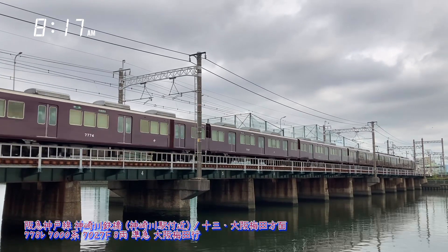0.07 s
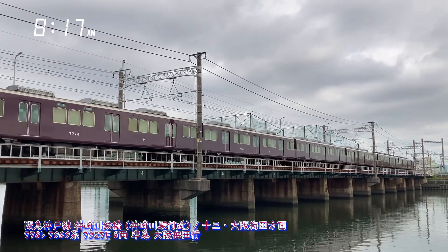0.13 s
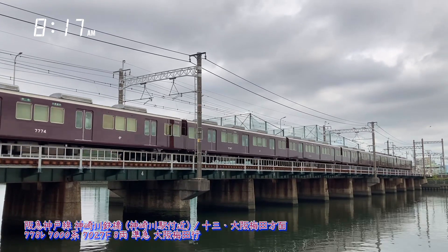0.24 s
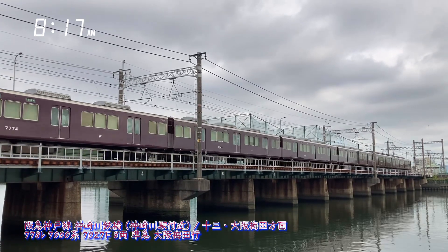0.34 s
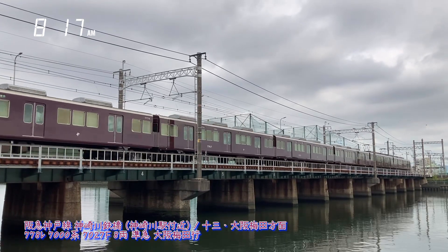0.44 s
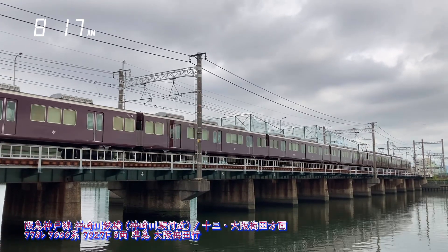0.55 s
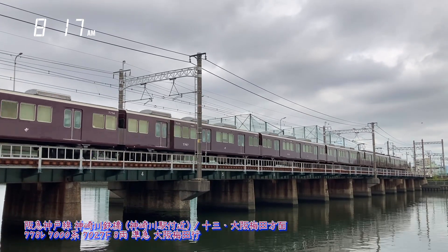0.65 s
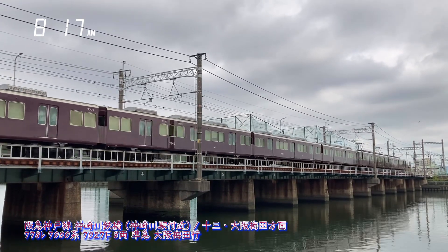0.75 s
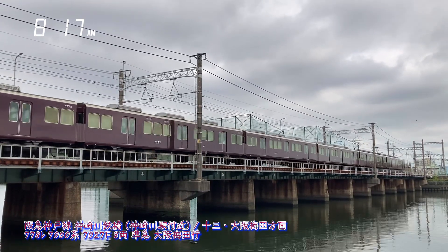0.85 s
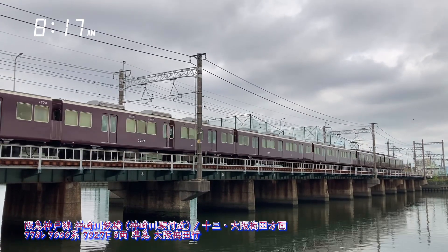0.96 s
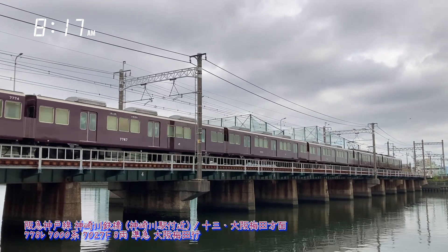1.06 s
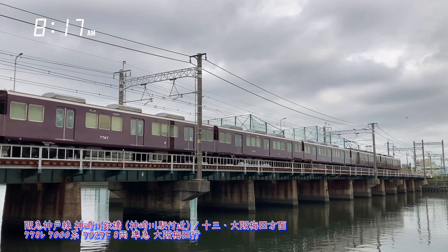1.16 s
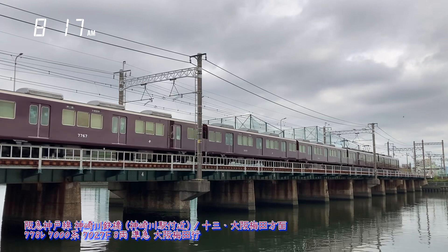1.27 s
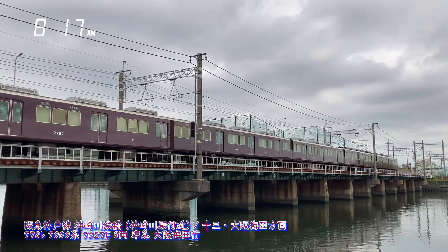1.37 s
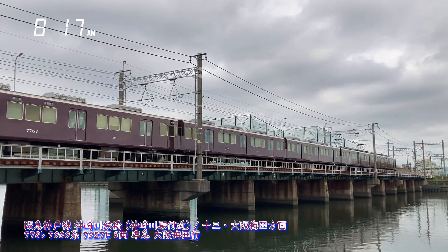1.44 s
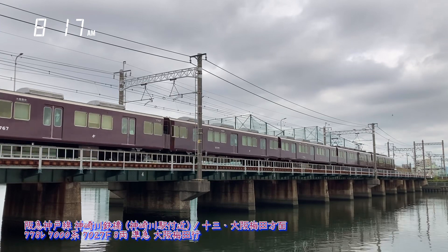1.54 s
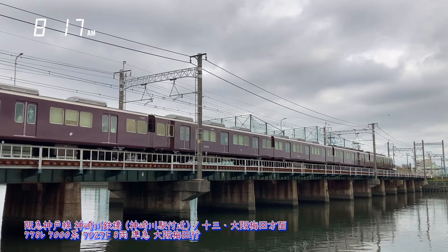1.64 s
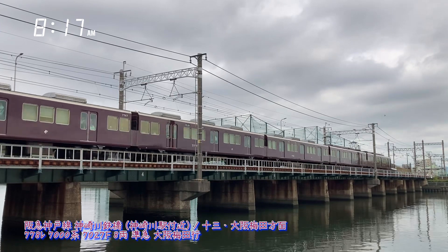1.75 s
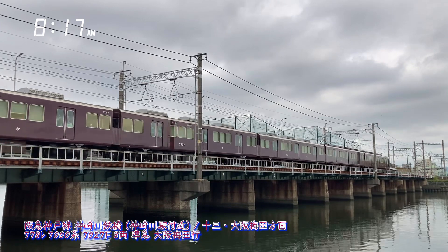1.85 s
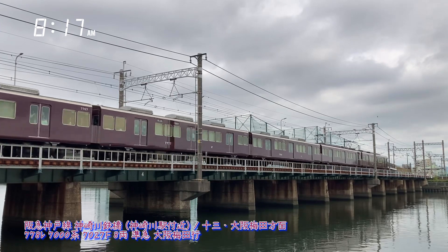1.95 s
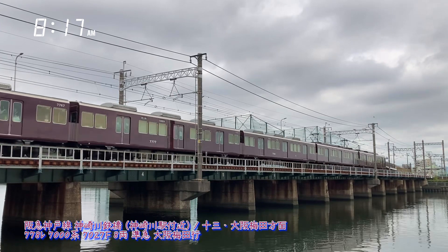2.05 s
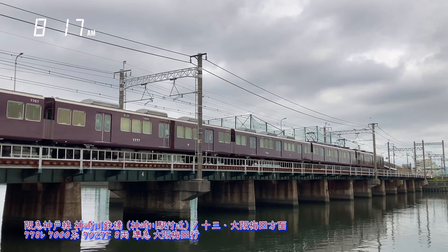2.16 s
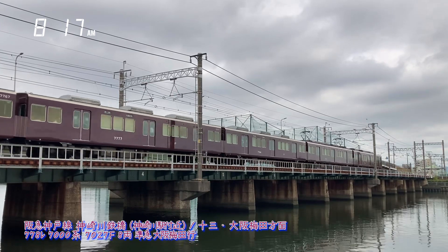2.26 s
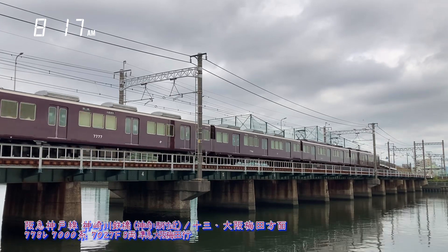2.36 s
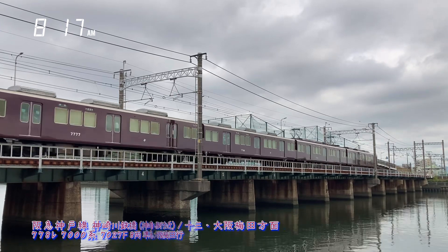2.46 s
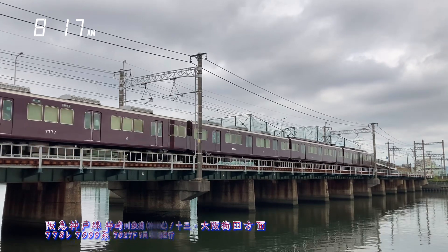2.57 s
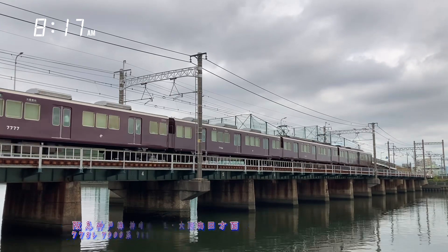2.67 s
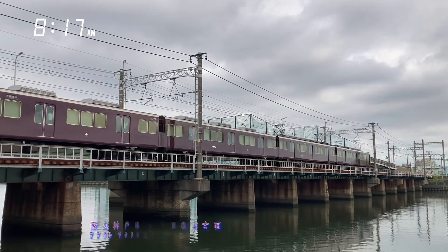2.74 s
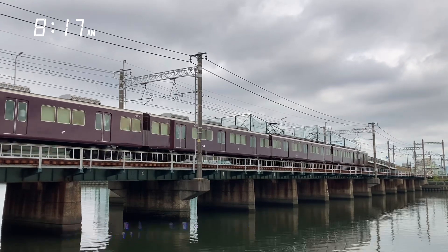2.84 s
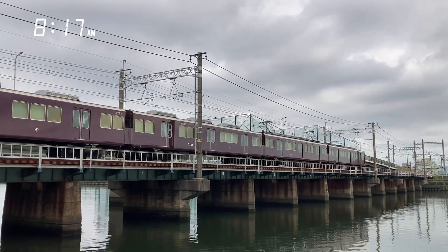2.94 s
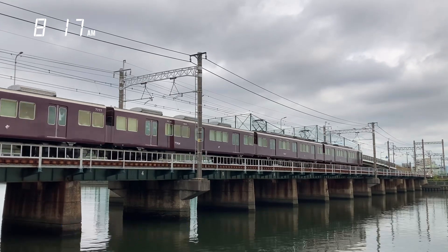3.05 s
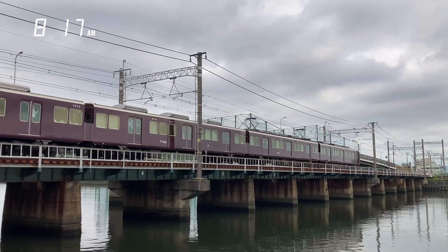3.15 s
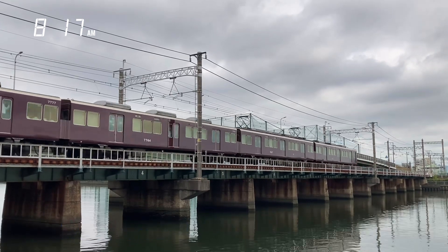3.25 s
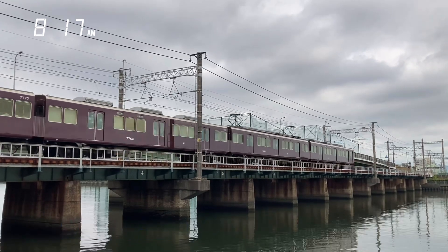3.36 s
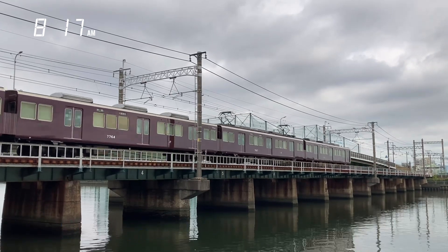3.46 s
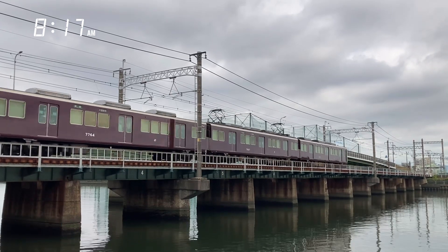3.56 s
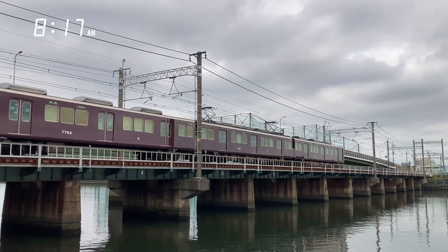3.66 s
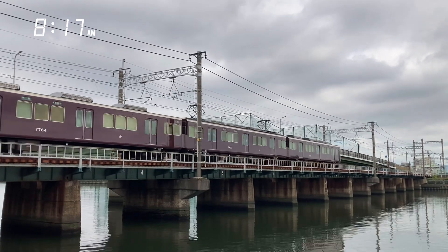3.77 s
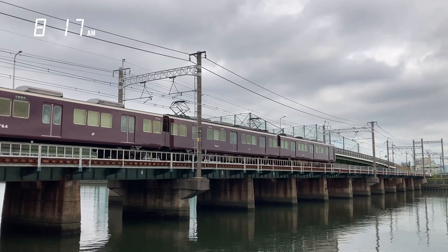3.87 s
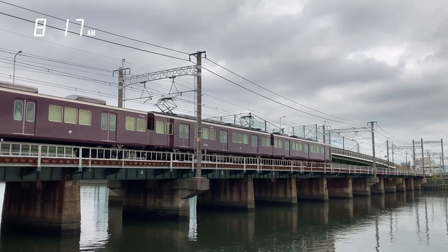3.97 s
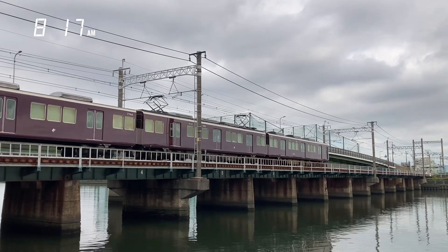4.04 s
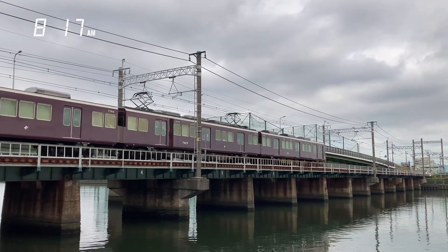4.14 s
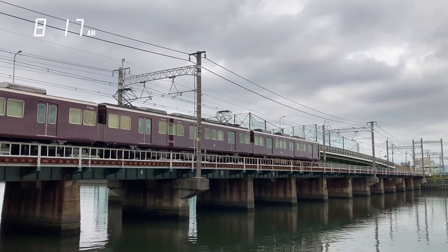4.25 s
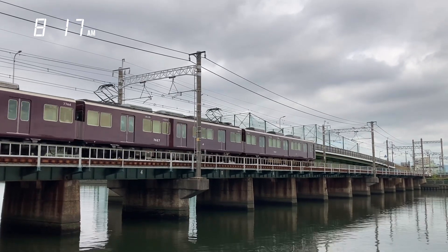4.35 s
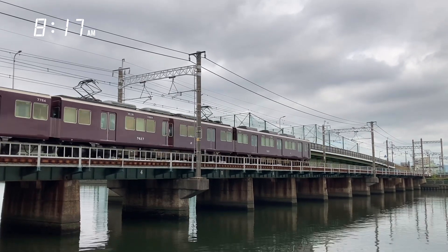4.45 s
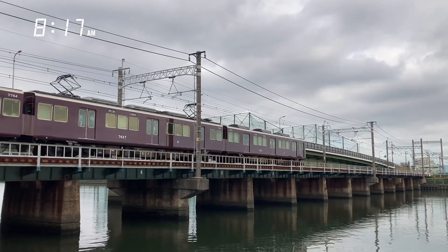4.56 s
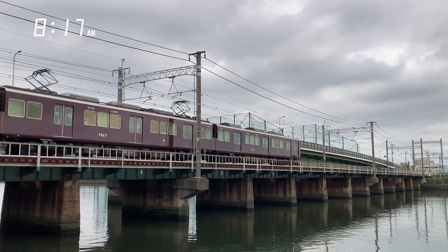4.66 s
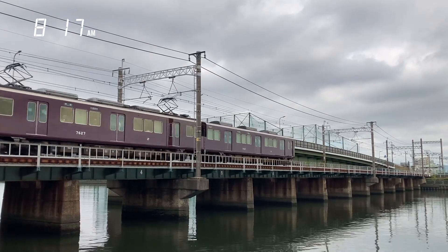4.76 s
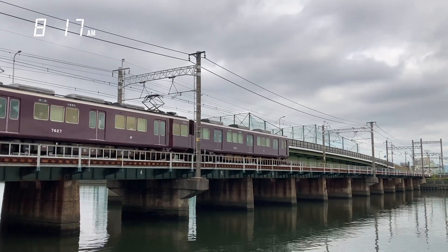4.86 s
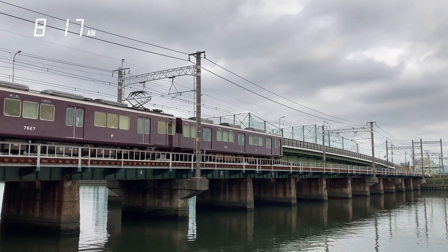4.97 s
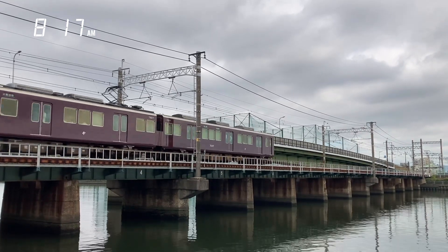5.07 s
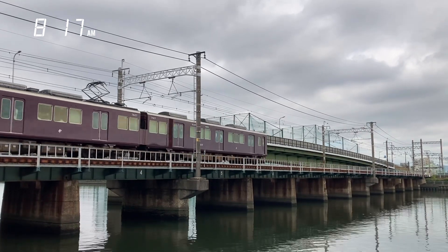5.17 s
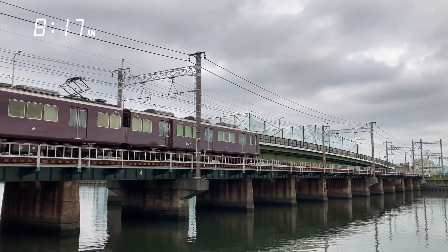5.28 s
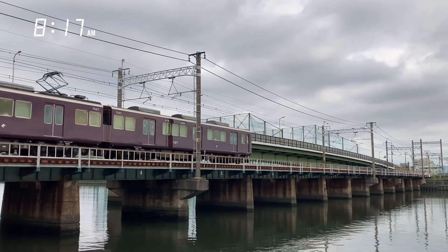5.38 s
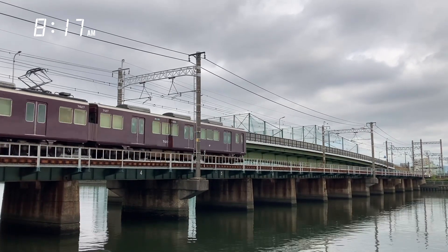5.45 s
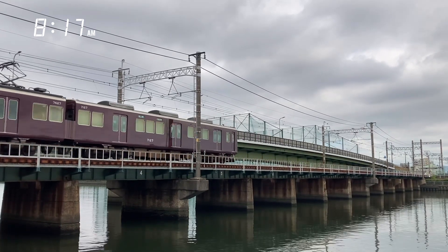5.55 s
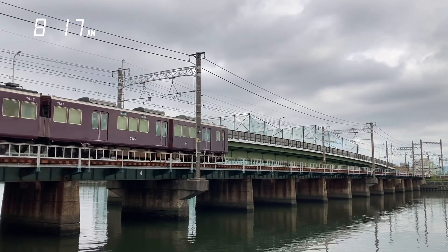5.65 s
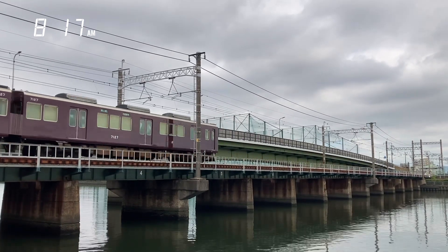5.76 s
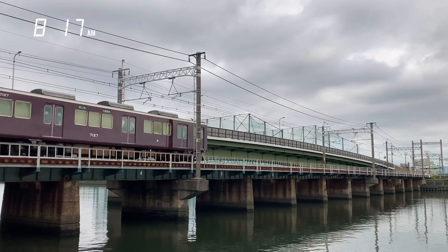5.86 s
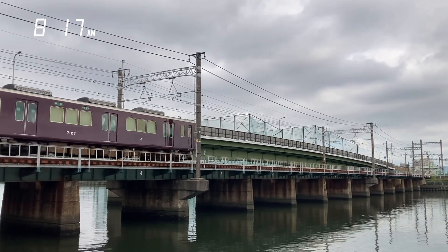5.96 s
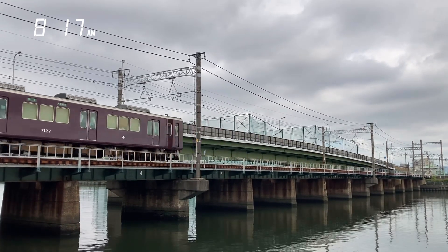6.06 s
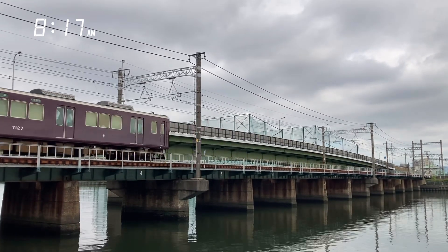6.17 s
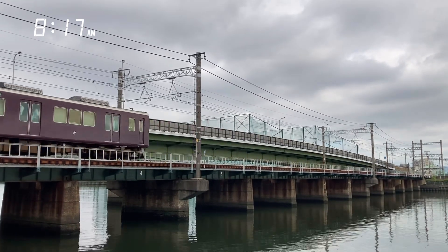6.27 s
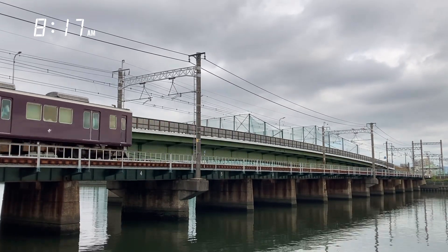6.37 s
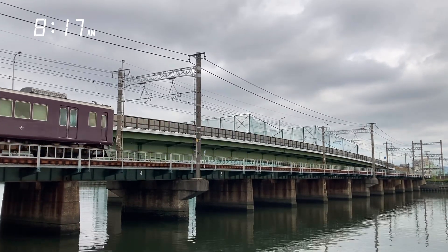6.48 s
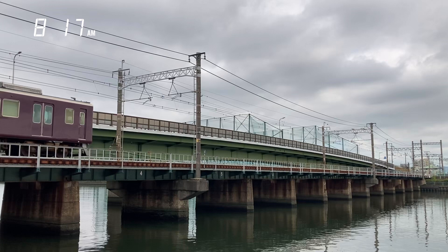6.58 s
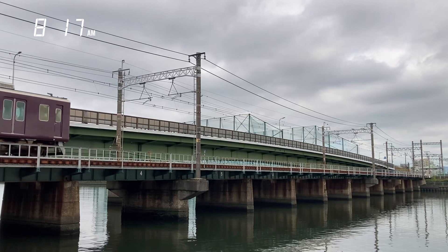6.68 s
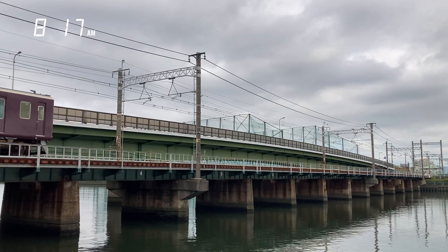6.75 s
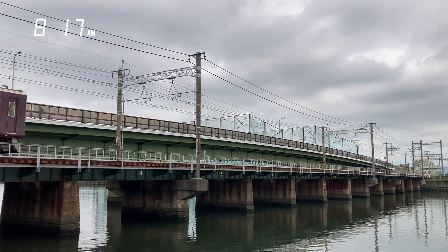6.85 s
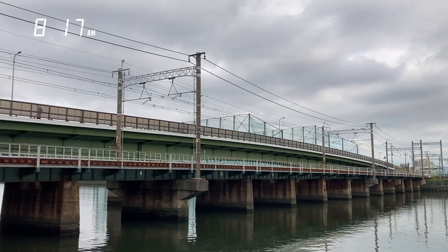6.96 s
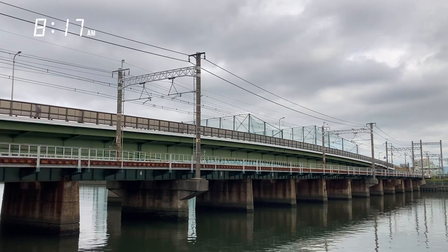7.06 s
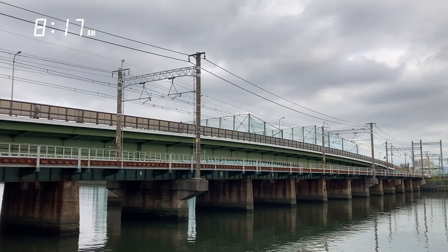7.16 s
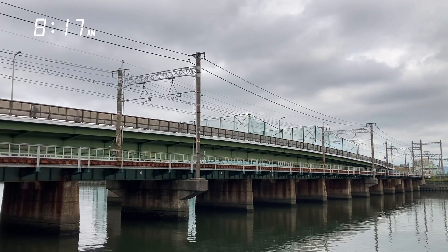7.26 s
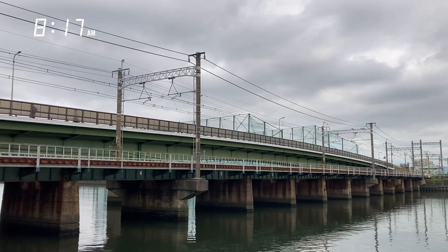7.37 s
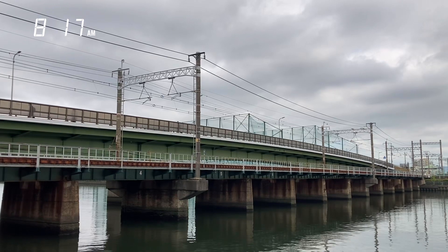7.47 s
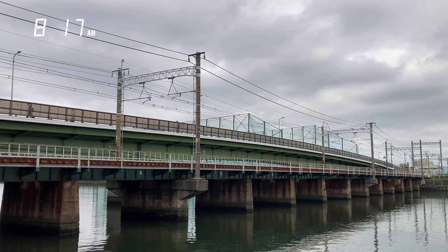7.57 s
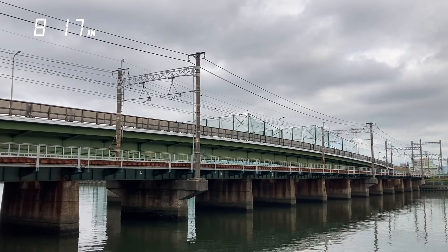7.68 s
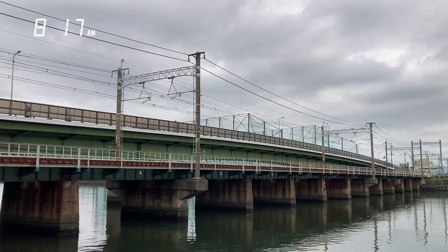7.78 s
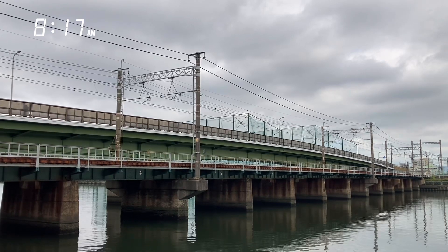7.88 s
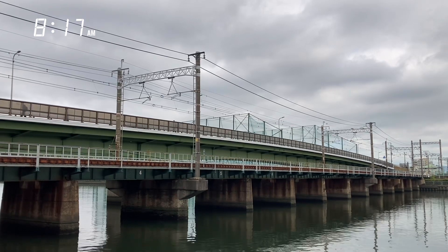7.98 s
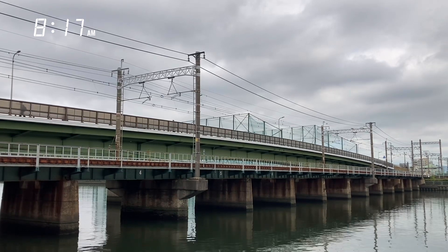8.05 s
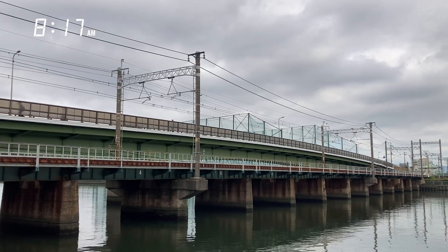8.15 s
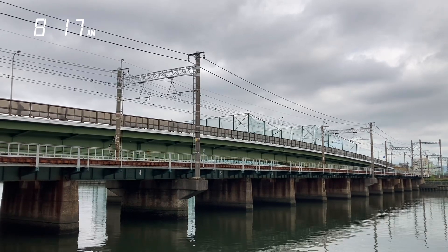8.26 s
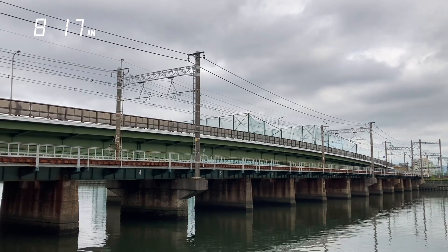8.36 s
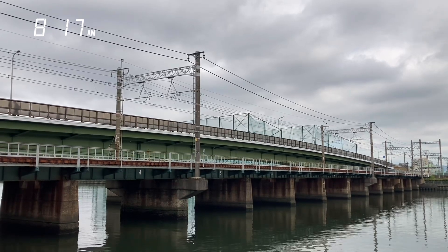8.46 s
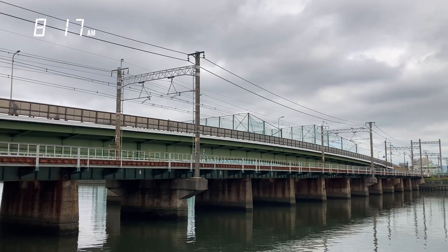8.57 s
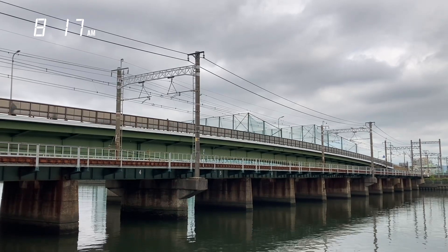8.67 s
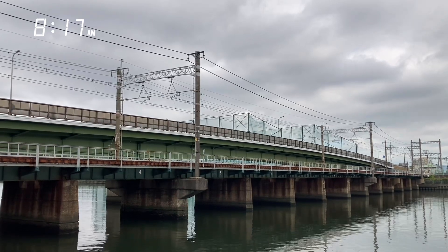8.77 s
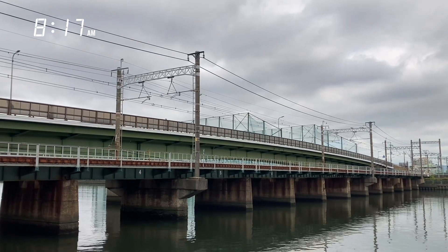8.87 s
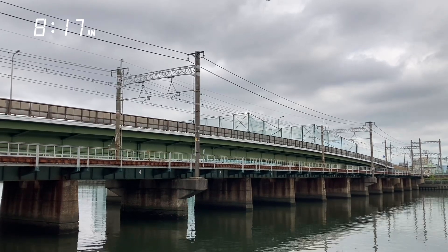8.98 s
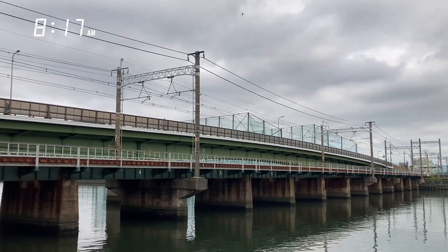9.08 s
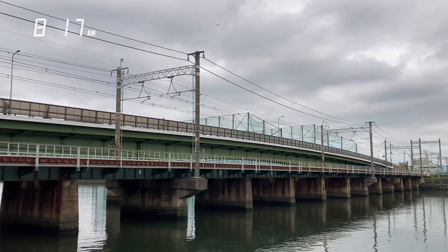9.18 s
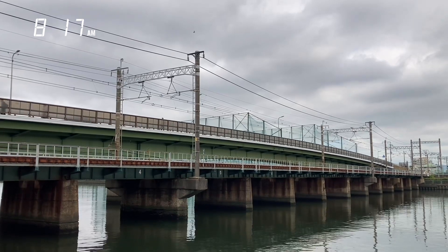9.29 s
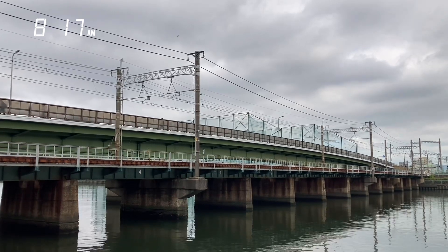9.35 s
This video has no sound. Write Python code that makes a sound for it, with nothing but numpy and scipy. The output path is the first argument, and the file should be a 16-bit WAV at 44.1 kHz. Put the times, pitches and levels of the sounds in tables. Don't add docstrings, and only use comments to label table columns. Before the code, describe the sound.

An electric train pounds across a steel girder bridge, quick paired wheel clacks over a booming rumble, then passes and leaves faint squeal and soft hiss.

```python
import sys
import numpy as np
from scipy import signal
from scipy.fft import rfft, irfft, next_fast_len
from scipy.io import wavfile

SR = 44100
rng = np.random.default_rng(int(sys.argv[2]) if len(sys.argv) > 2 else 0)


def materialize(psi):
    bounded = np.clip(np.atleast_2d(psi).T, -1, 1)
    quanta = np.round(bounded * 32767).astype(np.int16)
    wavfile.write(sys.argv[1], SR, quanta)


def magnitude_from_level(level_db):
    exponent = np.asarray(level_db, float) / 20
    return 10 ** exponent


N = 415422


def rms_one(x):
    return x / np.sqrt(np.mean(x ** 2) + 1e-20)


def in_time(rows):
    s, *columns = np.transpose(rows)
    return [np.interp(np.arange(N) / SR, s, c) for c in columns]


def at_hz(points, hz):
    table_hz, values = np.transpose(points)
    return np.interp(np.log(hz), np.log(table_hz), values)


def drift(rate):
    r = np.exp(-80 * np.pi * rate / SR)
    white = rng.standard_normal(N // 40 + 2002)
    slow = rms_one(signal.lfilter([1], [1, -2 * r, r * r], white)[2000:])
    return np.interp(np.arange(N) / 40, np.arange(len(slow)), slow)


def slow_gain(db):
    return np.repeat(magnitude_from_level(db[::16]), 16)[:N]


def shares(hz):
    boom = 1 / (1 + (hz / 200) ** 4)
    treble = 1 / (1 + (1400 / hz) ** 4)
    return boom, 1 - boom - treble, treble


BAND_EDGES_HZ = 30 * 2 ** (np.arange(28) / 3)


def banded(colour, level):
    out, total = 0, 0
    white = rng.standard_normal((2, 2, N))
    for k, (low, high) in enumerate(zip(BAND_EDGES_HZ, BAND_EDGES_HZ[1:])):
        hz = np.sqrt(low * high)
        gain = magnitude_from_level(at_hz(colour, hz))
        total += gain ** 2 * (high - low) / (SR / 2)
        band_pass = signal.butter(2, [low, high], "band", fs=SR, output="sos")
        out = out + gain * level(hz) * signal.sosfilt(band_pass, white[k % 2])
    return out / np.sqrt(total)


# (pitch [Hz], width [Hz], level over the roar [dB])
GIRDER_PITCHES = [(97, 11.8, 7.5), (122.6, 5.2, 6), (145, 10.6, 3.5), (255, 25, -2.5), (325.3, 56, 2.5),
                  (381, 30, -1.5), (440, 11, -7), (777, 110, -15.5), (1307, 80, -6), (2088, 150, -1),
                  (2800, 220, -9.5), (4060, 350, -6)]


def girders(x):
    out = x.copy()
    for hz, width_hz, lift_db in GIRDER_PITCHES:
        r = np.exp(-np.pi * width_hz / SR)
        push = (1 - r * r) / 2
        ring = [1, -2 * r * np.cos(2 * np.pi * hz / SR), r * r]
        out += magnitude_from_level(lift_db) * signal.lfilter([push, 0, -push], ring, x)
    return out


def through_air(x):
    return signal.sosfilt(signal.butter(3, 10800, fs=SR, output="sos"), x)


# (pitch [Hz], level [dB])
LEFT_OVER_RIGHT = [(60, -.5), (110, -.5), (200, .5), (380, 1.2), (700, 3.8), (1290, 3), (2380, 1),
                   (4400, 1), (8120, 0), (15000, 0)]


def microphones(pair, lag_s, alike):
    shade_hz, in_step_hz, turn_hz = 6100, 7000, 4400
    linger = 0.55
    size = next_fast_len(N + 512)
    hz = np.arange(1, size // 2 + 2) * SR / size
    first, second = rfft(pair, size)
    shaded = (hz - in_step_hz) / turn_hz
    shaded = shaded - linger * np.sin(4 * np.pi * shaded) / (4 * np.pi)
    turns = np.where(hz < shade_hz, -hz * lag_s, shaded)
    common = np.clip(at_hz(alike, hz), 0, 1)
    right = common * first * np.exp(2j * np.pi * turns) + np.sqrt(1 - common ** 2) * second
    tilt = magnitude_from_level(at_hz(LEFT_OVER_RIGHT, hz) / 2)
    return irfft([first * tilt, right / tilt], size)[:, :N]


# (time [s], level [dB], brightness [dB])
ROLLING_COURSE = [(0.0, -14.5, -0.5), (0.35, -18, 0.5), (1.0, -17, -3.5), (1.6, -18, 0), (3.0, -16.5, -2.5),
                  (3.9, -18.5, 2.5), (4.8, -19, 1.5), (5.5, -22, 2.5), (5.85, -20, 4), (6.55, -28, 3.5),
                  (6.85, -14.5, -3), (7.25, -22, -2.5), (7.8, -28.5, -3.5), (8.2, -34.5, 1.5),
                  (8.36, -24.5, -6), (8.8, -35, -5), (9.42, -47.5, -1.5)]
# (pitch [Hz], level [dB per Hz])
ROLLING_COLOUR = [(24, -52), (40, -13), (100, -2), (200, -5), (350, -10.5), (700, -6), (1100, -13.5),
                  (1560, -26), (2100, -28.5), (4500, -43), (7300, -45.5), (11200, -47), (15500, -48)]


def rolling():
    patchy_db = 1.64
    level_db, bright_db = in_time(ROLLING_COURSE)
    middle_db, treble_db = bright_db - 2, bright_db + 1.5
    together = drift(1.24)

    def level(hz):
        boom, plates, treble = shares(hz)
        patches_db = patchy_db * (together + drift(12.0))
        return slow_gain(level_db + plates * middle_db + treble * treble_db + patches_db)
    return through_air(girders(magnitude_from_level(-1) * banded(ROLLING_COLOUR, level)))


# (time [s], level [dB])
TOWN_COURSE = [
    (0, 11.5),
    (8.0, 6.5),
    (9.42, 5.5),
]
# (pitch [Hz], level [dB per Hz])
TOWN_HISS_COLOUR = [(24, -33), (40, 1.5), (70, 8.5), (114, -1.5), (400, -10), (1300, -17.5), (3500, -18),
                    (5000, -15), (6500, -38.5), (8000, -15), (12000, -59.5), (15500, -23)]


def town():
    train_gone_s, clearing_s = 8.65, 0.14
    level_db, = in_time(TOWN_COURSE)
    top_db = 0.5 + 11 / (1 + np.exp((train_gone_s - np.arange(N) / SR) / clearing_s))

    def level(hz):
        return slow_gain(level_db - 44 + top_db / (1 + (10000 / hz) ** 6))
    return banded(TOWN_HISS_COLOUR, level)


# (pitch [Hz], share [0-1])
STEADY_ALIKE = [(60, .975), (300, .96), (700, .9), (1500, .6), (5500, .45), (7000, .9), (15000, .9)]


def steady_layers():
    return microphones(rolling() + town(), 0.00041, STEADY_ALIKE)


def axles(bogies, usual_db, gap_s):
    rows = []
    for s, first_db, second_db, boom_db in bogies:
        first_spare_db, second_spare_db = usual_db - first_db, usual_db - second_db
        rows.append((s, first_db, boom_db, 0.84 * first_spare_db, first_spare_db))
        rows.append((s + gap_s, second_db, boom_db, 0.84 * second_spare_db, second_spare_db - 1.8))
    return rows


def clicks(rows, sizes):
    out = np.full(N, 1e-18)
    out[(np.array(rows)[:, 0] * SR).astype(int)] = sizes
    return out


def joint_roar(blows, colour, rises, t60s, rattle_db, crack_db):
    s, blow_db, boom_db, clang_db, top_db = np.transpose(blows)
    scatter_db = 2.0 * rng.standard_normal((len(s), len(BAND_EDGES_HZ)))
    rattle = drift(42.0)
    tail = magnitude_from_level(-120 / (1.0 * SR))
    late = magnitude_from_level(-9) ** 2

    def level(hz):
        boom, plates, treble = shares(hz)
        top = 1 / (1 + (6000 / hz) ** 4)
        uneven_db = scatter_db[:, np.searchsorted(BAND_EDGES_HZ, hz)]
        hit_db = blow_db + boom * boom_db + plates * clang_db + top * top_db + uneven_db
        energy = clicks(blows, magnitude_from_level(hit_db) ** 2)
        fall = magnitude_from_level(-120 / (max(at_hz(t60s, hz), 0.05) * SR))
        rise = np.exp(-1 / (max(at_hz(rises, hz), 0.0005) * SR))
        start, next_step = (1 - rise) * np.array([1 + late, -tail - late * fall])
        decays = [start, next_step, 0, 1, -fall - tail, fall * tail]
        swell = signal.sosfilt([decays, [1, 0, 0, 1, -rise, 0]], energy)
        if hz < 3000:
            return np.sqrt(np.abs(swell))
        crack = signal.lfilter([top ** 3 * magnitude_from_level(crack_db) ** 2], [1, -np.exp(-1 / (0.003 * SR))], energy)
        return np.sqrt(np.abs(swell + crack))
    return magnitude_from_level(rattle_db * rattle) * banded(colour, level)


def rail_ring(blows, modes):
    out = 0
    scatter_db = 4.6 * rng.standard_normal((len(blows), len(modes)))
    for k, (hz, level_db, t60) in enumerate(modes):
        r, w = magnitude_from_level(-60 / (t60 * SR)), 2 * np.pi * hz / SR
        struck = clicks(blows, magnitude_from_level(np.array(blows)[:, 1] + level_db + scatter_db[:, k]))
        struck = np.roll(struck, round(SR / hz))
        out = out + signal.lfilter([0, np.sin(w)], [1, -2 * r * np.cos(w), r * r], struck)
    return out * np.array([[1], [0.3]])


# (time [s], first axle [dB], second axle [dB], boom below 200 Hz [dB])
FAR_BOGIES = [(0.0214, -13.5, -18, -5), (0.4085, -15.5, -16, 3.5), (1.1897, -12.5, -17.5, 0.5),
              (1.5763, -17.5, -17, 3), (2.36, -18, -18.5, 5), (2.7506, -18, -15, -0.5),
              (3.5244, -18.5, -19.5, 4), (3.917, -16.5, -16, 5), (4.6887, -17.5, -18, 5),
              (5.0769, -17.5, -17, 2.5), (5.8486, -19.5, -19, 2.5), (6.2327, -16, -17, 2.5),
              (7.0055, -15.5, -15.5, 2), (7.39, -14.5, -14.5, 0.5), (8.1599, -13, -14, -0.5)]
# (time [s], level [dB])
DISTANT_KNOCKS = [
    (0.685, -29.5),
    (0.7741, -29),
    (1.0355, -31),
    (1.8472, -26.5),
    (3.016, -27),
    (4.19, -54),
    (5.3577, -36),
    (5.4296, -31),
    (6.5866, -28.5),
    (7.2399, -31.5),
]
# (pitch [Hz], level [dB per Hz])
FAR_BLOW_COLOUR = [(30, -39), (50, -14), (100, -2), (235, -11), (400, -10), (820, -7.5), (1200, -22.5),
                   (1600, -17.5), (2300, -22), (3470, -25.5), (4570, -29), (7500, -35.5), (11200, -37),
                   (15500, -40)]
# (pitch [Hz], rise [s])
FAR_SWELL = [(60, 0.038), (300, 0.021), (2000, 0.0076), (12000, 0.0089)]
# (pitch [Hz], time to fall 60 dB [s])
FAR_DECAY = [(60, .55), (300, .45), (2000, .3), (12000, .3)]
# (pitch [Hz], level [dB], time to fall 60 dB [s])
FAR_RAIL_PITCHES = [(100, -4, .5), (122, -5, .4), (400, -7, .25), (1600, -12, .07), (1733, -8, .07),
                    (1900, -8, .07), (2132, -6, .1), (2280, -9, .07), (2430, -8, .07), (2620, -10, .06),
                    (2783, -8, .1)]
# (pitch [Hz], share [0-1])
FAR_SHARED = [(60, .985), (300, .97), (700, .93), (1500, .87), (5500, .7), (7000, .92), (15000, .9)]


def far_joint():
    blows = axles(FAR_BOGIES, usual_db=-18.5, gap_s=0.1272)
    blows += [(s, db, 4, 8, 0) for s, db in DISTANT_KNOCKS]
    roar = joint_roar(blows, FAR_BLOW_COLOUR, FAR_SWELL, FAR_DECAY, rattle_db=0.16, crack_db=-5)
    struck = girders(magnitude_from_level(1.0) * roar) + magnitude_from_level(-8.5) * rail_ring(blows, FAR_RAIL_PITCHES)
    return microphones(through_air(struck), 0.000425, FAR_SHARED)


# (time [s], first axle [dB], second axle [dB], boom below 200 Hz [dB])
NEAR_BOGIES = [(0.0471, -23, -23, 9.5), (0.8286, -20, -24, 8), (1.2202, -28, -21, 7),
               (1.989, -22.5, -23, 11), (2.384, -21.5, -22, -2), (3.16, -20.5, -24.5, 3),
               (3.5552, -22.5, -21.5, 1), (4.3285, -20.5, -23.5, 7), (4.7153, -20.5, -22.5, 2.5),
               (5.4835, -20.5, -21.5, 8.5), (5.8748, -22.5, -25.5, 3.5), (6.6441, -21, -22.5, 8)]
# (pitch [Hz], level [dB per Hz])
NEAR_BLOW_COLOUR = [(24, -45), (40, -31), (85, -5.5), (200, -9), (340, -3), (840, -4.5), (1250, -10.5),
                    (1600, -12), (3000, -16), (5600, -26), (7300, -25), (10900, -25.5), (13000, -21),
                    (15500, -53)]
# (pitch [Hz], rise [s])
NEAR_SWELL = [(60, 0.029), (300, 0.0021), (2000, 0.01), (4500, 0.0085), (12000, 0.0035)]
# (pitch [Hz], time to fall 60 dB [s])
NEAR_DECAY = [(60, 0.72), (300, 0.67), (2000, 0.27), (12000, 0.44)]
# (pitch [Hz], level [dB], time to fall 60 dB [s])
NEAR_RAIL_PITCHES = [(96.5, 0, 0.48), (141.3, -2.5, 0.19), (321.5, -1.5, 0.1), (386, -8, 0.15),
                     (455, -7, 0.08), (1000, -12, .05), (1200, -14, .05), (1950, -16, .05),
                     (2950, -21, .09), (4050, -23, .04)]
# (pitch [Hz], share [0-1])
NEAR_SHARED = [(60, .985), (300, .97), (700, .92), (1500, .78), (5500, .65), (7000, .92), (15000, .92)]


def near_joint():
    blows = axles(NEAR_BOGIES, usual_db=-20.5, gap_s=0.1295)
    roar = joint_roar(blows, NEAR_BLOW_COLOUR, NEAR_SWELL, NEAR_DECAY, rattle_db=0.26, crack_db=1)
    struck = girders(magnitude_from_level(6.5) * roar) + magnitude_from_level(9.0) * rail_ring(blows, NEAR_RAIL_PITCHES)
    return microphones(through_air(struck), 0.00025, NEAR_SHARED)


# (time [s], pitch [Hz], level [dB])
SQUEAL_COURSE = [
    (7.66, 1400, -75),
    (7.76, 1409, -53),
    (8.09, 1385, -53),
    (8.3, 1400, -57),
    (8.44, 1420, -51),
    (8.54, 1460, -51),
    (8.72, 1395, -52),
    (8.8, 1330, -60),
    (8.9, 1300, -78),
]


def squeal():
    hz, level_db = in_time(SQUEAL_COURSE)
    phase = 2 * np.pi * np.cumsum(hz * (1 + 0.006 * drift(25.0))) / SR
    t = np.arange(N) / SR
    sounding = (t > SQUEAL_COURSE[0][0]) & (t < SQUEAL_COURSE[-1][0])
    tone = np.sin(phase) + magnitude_from_level(-10) * np.sin(2 * phase)
    grip = magnitude_from_level(level_db + 1.6 * drift(16.0))
    return sounding * grip * tone * magnitude_from_level([[1.5], [-1.5]])


def scene():
    return steady_layers() + far_joint() + near_joint() + squeal()


def band_limit(x):
    return signal.sosfilt(signal.butter(12, 17110, fs=SR, output="sos"), x)


def record(dry):
    ceiling = 1.1
    heard = signal.sosfilt(signal.butter(4, 47, "high", fs=SR, output="sos"), dry)
    water_band = signal.iirpeak(3455, 3455 / 290, fs=SR)
    heard = heard - 0.18 * signal.lfilter(*water_band, heard)
    heard = signal.lfilter(*signal.iirnotch(9150, 9150 / 700, fs=SR), heard)
    heard = ceiling * np.tanh(heard / ceiling)
    heard = signal.sosfilt(signal.ellip(10, 0.5, 70, 15800, fs=SR, output="sos"), heard)
    return band_limit(heard)


dry = scene()
out = record(dry)
materialize(out)
```